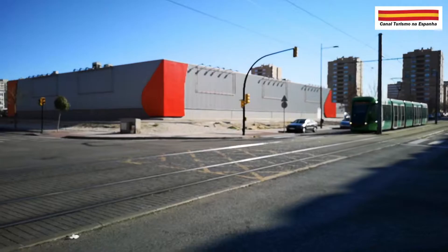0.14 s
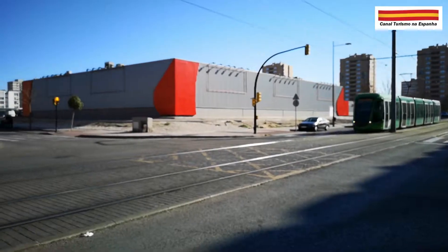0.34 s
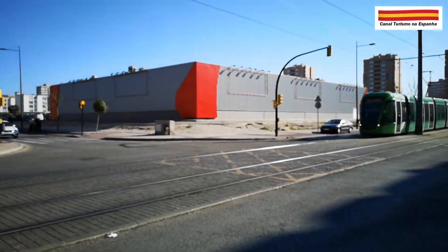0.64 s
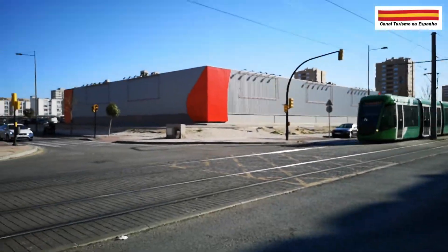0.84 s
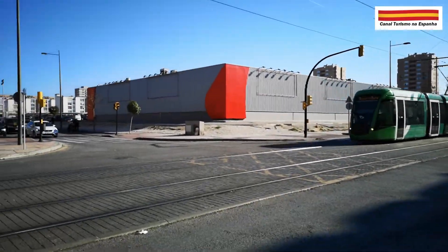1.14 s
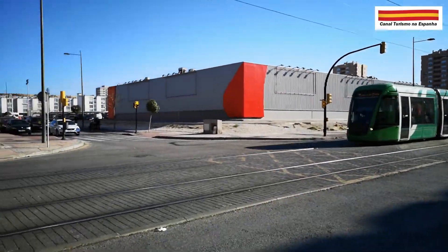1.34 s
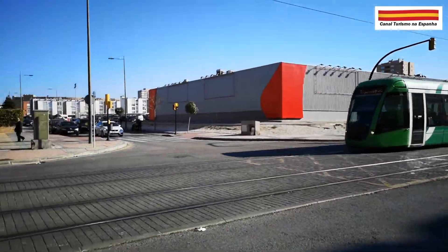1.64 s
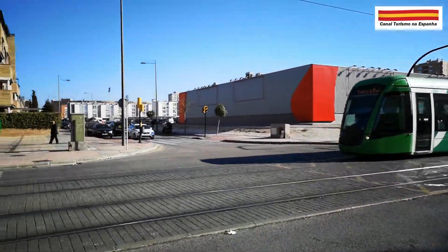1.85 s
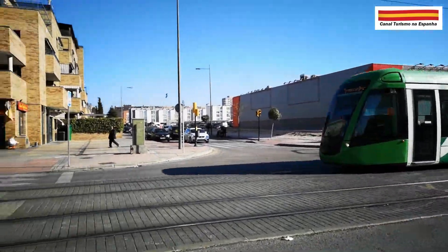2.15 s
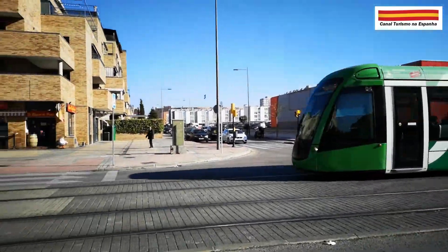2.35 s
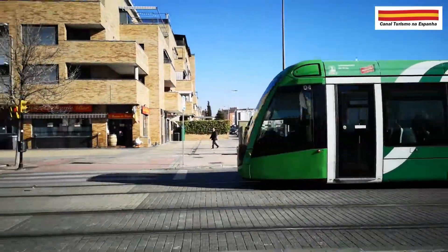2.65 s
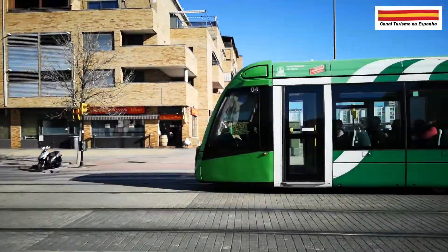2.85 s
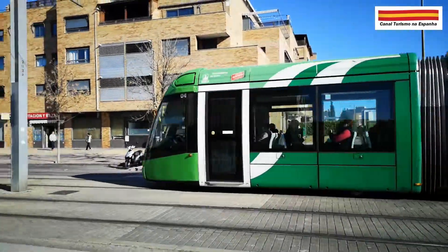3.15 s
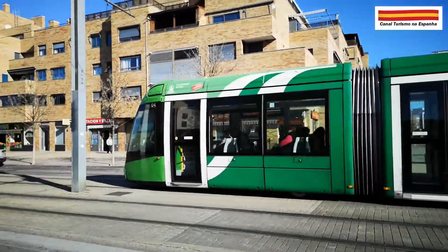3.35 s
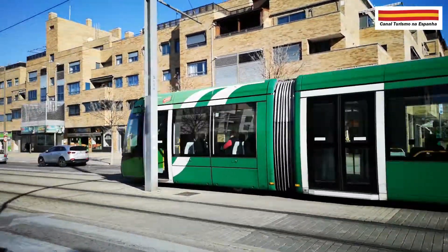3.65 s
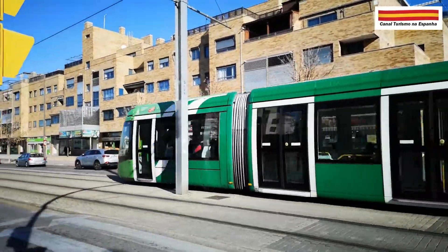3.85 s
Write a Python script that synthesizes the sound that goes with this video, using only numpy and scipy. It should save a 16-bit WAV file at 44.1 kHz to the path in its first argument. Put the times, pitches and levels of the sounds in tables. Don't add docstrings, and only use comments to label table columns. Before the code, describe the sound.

A tram approaches along street tracks, low rumble and rail knocks building, then passes close with booming, hissing wheels and a whine, over traffic hum, on a breezy outdoor hand-held stereo microphone.

```python
import sys
import numpy as np
from scipy import signal
from scipy.fft import rfft, irfft, next_fast_len
from scipy.io import wavfile
from scipy.ndimage import uniform_filter1d, map_coordinates

SR = 44100
rng = np.random.default_rng(int(sys.argv[2]) if len(sys.argv) > 2 else 0)


def persist_wave(psi):
    counts = np.round(np.clip(psi, -1, 1) * 32767).astype(np.int16)
    wavfile.write(sys.argv[1], SR, np.atleast_2d(counts).T)


def ratio(d):
    e = np.asarray(d, float) / 20
    return 10 ** e


N = 176400
T = np.arange(N) / SR

# time in seconds, level in dB.
NEARNESS = [
    (0.0, -40),
    (0.03, -44),
    (3.41, -28),
    (3.95, -32.5),
]
# time in seconds, level in dB, upper modes over lower in dB.
RAIL_SHAKE = [(0, -31, -0.5), (.8, -30, -2), (1.25, -31, 0.5), (1.37, -24.5, -3.5), (1.5, -26, -0.5),
              (2.1, -28, -1.5), (2.3, -29, 6.5), (2.56, -29.5, 10), (2.7, -33.5, 5), (2.8, -23.5, 6),
              (2.95, -14.5, 2.5), (3.1, -18.5, 2.5), (3.25, -28, 7), (3.55, -20.5, -3.5),
              (3.75, -21.5, 4.5), (4, -15.5, -3)]
# frequency in Hz, width in Hz, level in dB.
FLOOR_MODES = [(162, 11, -14), (208.1, 29.7, -1.5), (254, 62, -12), (290, 61.5, -7.5), (359.3, 20, -7),
               (393.8, 17.4, -11)]
# start in seconds, peak level in dB, ring in Hz.
RAIL_JOINTS = [(0.137, -26, 249), (0.354, -24.5, 183), (0.417, -24, 257), (0.467, -20.5, 226),
               (0.573, -22, 251), (0.652, -20.5, 239), (0.76, -21.5, 235), (0.824, -18, 248.4),
               (1.277, -24, 163), (1.362, -16.5, 202), (1.57, -27, 238), (1.915, -23, 263),
               (2.044, -29, 196), (2.119, -18.5, 224), (2.236, -19.5, 282), (2.272, -17, 225),
               (2.378, -19, 239), (2.508, -18, 279.7), (2.556, -13, 295.3), (2.669, -17, 239.4),
               (2.775, -13.5, 198), (2.806, -13.5, 173), (2.84, -11.5, 201), (2.92, -6, 197.6),
               (2.966, -9, 285), (3.044, -6.5, 195), (3.089, -9, 282), (3.205, -19, 200.5),
               (3.383, -15, 205.6), (3.471, -12, 246), (3.627, -17, 202), (3.701, -9.5, 214),
               (3.718, -10, 219), (3.759, -7.5, 195.6), (3.83, -7, 192), (3.878, -15, 289),
               (3.936, -16.5, 368.3), (3.953, -9, 195.7)]
# frequency in Hz, level in dB.
PANEL_RATTLE = [(200, -100), (400, -19.5), (480, 2), (800, 0), (1100, -15), (3000, -120)]
# frequency in Hz, level in dB.
ROLLING_HISS = [(250, -49), (450, 0.5), (900, -4), (1600, -7.5), (3000, -1.5), (4500, -24.5), (9500, -50),
                (16000, -57)]
# frequency in Hz, width in Hz, level in dB.
WHEEL_MODES = [(1255, 184, -1), (1876, 137, 0.5), (2470, 198, 4.5), (2950, 231, -0.5), (3300, 290, -11),
               (4105, 155, -13.5), (4570, 240, -17), (5630, 300, -21), (6990, 670, -27), (589, 97, -4.5),
               (990, 100, -27)]
# frequency in Hz, likeness from 0 to 1.
RING_LIKENESS = [(600, .4), (1200, .75), (3300, .7), (5000, .35)]
# frequency in Hz, width in Hz, level in dB.
SCRAPE_MODES = [(2488, 200, 3.5), (2780, 180, -6)]
# middle in seconds, half length in seconds, level in dB.
BOGIE_PASSES = [
    (2.5, .16, -7),
    (3.37, .08, -3.5),
    (3.53, .07, -3),
    (3.82, .15, -7),
]
# middle in seconds, half length in seconds, frequency in Hz, width in Hz, level in dB.
APPROACH_SONG = [
    (1.19, 0.24, 1200, 150, -46.5),
    (1.12, 0.35, 3020, 400, -45.5),
    (0.77, 1, 2700, 77, -52),
    (.8, 0.82, 2885, 70, -53.5),
]
# time in seconds, level in dB.
WHINE_LEVEL = [(.95, -62), (1.15, -52), (1.22, -48), (1.32, -55), (1.4, -46), (1.55, -45.5), (1.575, -58),
               (2.2, -50), (2.76, -51), (2.82, -40), (2.87, -48), (2.95, -35), (3.02, -44), (3.07, -54),
               (3.32, -52), (3.35, -33), (3.41, -36), (3.47, -44), (3.495, -33), (3.55, -37), (3.6, -44),
               (3.64, -34), (3.67, -48), (3.75, -58)]
# time in seconds, level in dB.
QUARTER_LEVEL = [(0, -49), (.3, -56), (1.2, -50), (1.45, -48), (1.62, -58), (1.76, -46), (2.03, -46),
                 (2.12, -54), (2.6, -49), (3, -56)]
# time in seconds, level in dB.
GEAR_LEVEL = [(.5, -62), (.66, -52), (.8, -52), (.87, -48), (1, -41), (1.1, -38), (1.135, -43), (1.17, -37),
              (1.255, -36.5), (1.28, -52), (1.5, -49), (1.6, -58)]
# middle in seconds, half length in seconds, pitch in Hz, slide in Hz per second, level in dB.
WHEEL_NOTES = [(2.81, .06, 5630, 1200, -56), (2.66, .1, 5520, 300, -63), (2.41, .06, 5990, 0, -66),
               (2.94, .04, 5500, 0, -61), (3.45, .3, 1825, -70, -50), (3.45, .3, 965, -30, -52),
               (2.85, .05, 2260, -900, -44), (1.08, .12, 2900, 0, -51), (3.85, .03, 840, 0, -42),
               (3.37, .06, 2470, 0, -41), (3.8, .08, 2430, -200, -43)]
# frequency in Hz, level in dB.
TRAFFIC_HUM = [(15, -7.5), (30, -7.5), (55, -8.5), (70, -10), (150, -11.5), (500, -39.5), (6000, -48.5),
               (12000, -100)]
# pitch in Hz, middle in seconds, half length in seconds, level in dB.
FAR_BRAKE = [(4861, .2, .13, -68), (5136, .38, .25, -73), (5981, .1, .2, -72), (7230, .43, .12, -75),
             (8533, .3, .5, -81)]
# middle in seconds, swing in Hz, level in dB.
WIND_GUSTS = [(.01, 36.8, -23.5), (0.303, 44, -30), (.8, 45.8, -26.5), (0.968, 43.7, -25),
              (1.502, 51.3, -28.5), (2.101, 33.5, -32), (2.489, 36.3, -23), (2.688, 39.2, -23.5),
              (2.735, 62.3, -22), (2.899, 59.7, -27.5), (3.182, 30.3, -32), (3.793, 44.7, -25.5),
              (3.907, 35.6, -22), (3.87, 107, -28), (3.959, 93, -32.5)]
# frequency in Hz, likeness from 0 to 1.
PORT_LIKENESS = [(30, 0.98), (100, 1), (200, 0.98), (300, 0.96), (420, 0.33), (610, 0.45), (1330, 0.11),
                 (2900, 0.19), (6000, 0.12)]
# frequency in Hz, level with tram ahead in dB, with tram beside in dB.
LEFT_COLOUR = [(390, -0.5, 2.5), (620, 0, 0.5), (1310, 1, 2.5), (1450, 3, 0.5), (2700, -3.5, 2),
               (2900, -11.5, -7), (3130, -3, -2), (8220, 14.5, 15.5)]
RIGHT_COLOUR = [(423, -0.5, 2.5), (620, 2, 4), (1290, -0.5, 1.5), (1710, -0.5, -3.5), (2220, 3, 6.5),
                (3180, 2.5, -0.5), (3500, 3, 2.5), (8200, 1.5, -0.5)]
# frequency in Hz, phase in radians.
LEFT_LEAD = [(520, -1.5), (780, -.2), (1250, -.9), (1980, -.9), (2300, -3.1), (2840, -2.6), (3250, -.8),
             (7060, 6.5)]
TURN_TIMES = (1, 3.2)
# frequency in Hz, level in dB.
SELF_HISS = [(6000, -82), (11200, -3), (15200, -7.5), (16000, -86.5)]

JOINT_DB, JOINT_S = -4, 0.0084
UPPER_RING, UPPER_DB, CLACK_DB = 1.55, -12, -24
KNOCK_TOP_HZ, RATTLE_DB = 1100, -16.5
WHEEL_DB, ROLL_DB = -2, -4.5
WHINE_HZ, SPEED_MS, PASS_S, DISTANCE_M = 1972, 13, 3.15, 6.5
GEAR_HZ, GEAR_RISE_HZ, GEAR_SETTLE_S = 1944, 38, .25
TRAFFIC_DB, TRAFFIC_GROWS = -36.5, 0.085
GUST_S = 0.035
TICK_S, TICK_DB, TICK_HZ, TICK_T60, SNAP_DB = .316, -18, 420, .011, -21
LEFT_TOP_HZ, SELF_DB = 9070, -83.5
LIMIT = .75


def unit(x):
    return x / np.sqrt(np.mean(x ** 2) + 1e-20)


def along(points, hz):
    f, value = np.transpose(points)
    return np.interp(np.log(hz + 1), np.log(f + 1), value)


def curves(rows):
    s, *columns = np.transpose(rows)
    return [np.interp(T, s, column) for column in columns]


def bump(s, half):
    return np.exp(-((T - s) / half) ** 2)


def wobble(rate):
    coarse = T[::64]
    knots = rng.standard_normal(int(N * rate / SR) + 4)
    return np.interp(T, coarse, map_coordinates(knots, [coarse * rate]))


def filtered(x, response):
    m = next_fast_len(N + SR // 2)
    return irfft(rfft(x, m) * response(np.fft.rfftfreq(m, 1 / SR)), m)[..., :N]


def modes(table):
    def response(f):
        total = 0
        for k, (centre, width, db) in enumerate(table):
            damping = 1j * f * width
            total = total + (-1) ** k * ratio(db) * damping / (centre * centre - f * f + damping)
        return total
    return response


def rush(response, patchy_db, alike=PORT_LIKENESS):
    z = signal.stft(rng.standard_normal((2, N)), nperseg=1024)[2]
    patches = uniform_filter1d(rng.standard_normal(z.shape[1:]), size=4, axis=0)
    patches = uniform_filter1d(patches, size=16, axis=1)
    pair = signal.istft(z * ratio(patchy_db * unit(patches)), nperseg=1024)[1][:, :N]

    def spread(hz):
        turn = np.arccos(np.clip(along(alike, hz), -1, 1)) / 2
        return response(hz) * [np.cos(turn), np.sin(turn)]
    mid, side = filtered(pair, spread)
    return unit(np.array([mid + side, mid - side]))


def tone(hz, drift_hz, flutter_db):
    phase = 2 * np.pi * np.cumsum(hz + drift_hz * wobble(60)) / SR
    gap, beads = .25 * wobble(3), wobble(35)
    sides = []
    for sign in (1, -1):
        flutter = ratio(flutter_db * (beads + .4 * wobble(12)))
        sides.append(flutter * np.sin(phase + sign * gap))
    return np.sqrt(2) * np.array(sides)


def boom():
    shake_db, upper_db = curves(RAIL_SHAKE)

    def edges(f):
        return (f / 150) ** 2 / (1 + (f / 150) ** 2) / (1 + (f / 430) ** 6)
    lower = rush(lambda f: modes(FLOOR_MODES[:3])(f) * edges(f), patchy_db=3.0)
    upper = rush(lambda f: modes(FLOOR_MODES[3:])(f) * edges(f), patchy_db=2.0)
    rattle = rush(lambda f: ratio(along(PANEL_RATTLE, f)), patchy_db=2.5)
    shaking = ratio(shake_db - 4) * (lower + ratio(upper_db - 4.5) * upper + ratio(RATTLE_DB) * rattle)
    knocks = sum(knock(*row) for row in RAIL_JOINTS)
    return shaking + filtered(knocks, lambda f: 1 / (1 + (f / KNOCK_TOP_HZ) ** 6))


def knock(s, db, hz):
    t = np.arange(SR // 8) / SR
    u, turn = t / JOINT_S, 2 * np.pi * hz * t
    ring = u * np.exp(1 - u) * (np.sin(turn) + ratio(UPPER_DB) * np.sin(UPPER_RING * turn))
    dull = unit(uniform_filter1d(rng.standard_normal((2, len(t))), size=40))
    clack = ratio(CLACK_DB) * 2 * u * np.exp(1 - 2 * u) * dull
    return np.pad(ratio(db + JOINT_DB) * (ring + clack), [(0, 0), (round(s * SR), N)])[:, :N]


def rolling():
    near_db, = curves(NEARNESS)
    hiss = ratio(ROLL_DB + 0.17 * wobble(6)) * rush(lambda f: ratio(along(ROLLING_HISS, f)), patchy_db=2.0)
    ring = rush(lambda f: modes(WHEEL_MODES)(f) / (1 + (f / 8500) ** 4), patchy_db=1.8,
                alike=RING_LIKENESS)
    ring = ratio(WHEEL_DB + .8 * wobble(16)) * ring
    scrape = ratio(2.5 * wobble(40)) * rush(lambda f: modes(SCRAPE_MODES)(f) ** 2, patchy_db=1.5)
    passes = sum(ratio(db) * bump(s, half) for s, half, db in BOGIE_PASSES)
    return approach() + ratio(near_db) * (hiss + ring + scrape * passes)


def approach():
    grain = rng.standard_normal(N) * ratio(1.8 * wobble(30))
    song = 0
    for s, half, hz, width, db in APPROACH_SONG:
        band = filtered(grain, lambda f: modes([(hz, width, 0)])(f) ** 2)
        song = song + ratio(db) * bump(s, half) * unit(band)
    return song


def drive():
    x = SPEED_MS * (T - PASS_S)
    whine_hz = WHINE_HZ * (1 - SPEED_MS / 343 * x / np.hypot(x, DISTANCE_M))
    gear_hz = GEAR_HZ - GEAR_RISE_HZ * np.exp((GEAR_LEVEL[0][0] - T) / GEAR_SETTLE_S)
    quarter = tone(whine_hz / 4, drift_hz=7, flutter_db=4)
    out = ratio(curves(QUARTER_LEVEL)[0]) * quarter * [[.6], [1.2]]
    for rows, hz in ((WHINE_LEVEL, whine_hz), (GEAR_LEVEL, gear_hz)):
        sounding = (T > rows[0][0]) * (T < rows[-1][0])
        out = out + sounding * ratio(curves(rows)[0]) * tone(hz, drift_hz=6, flutter_db=1.2)
    for s, half, hz, slide, db in WHEEL_NOTES:
        note = tone(hz + slide * (T - s), drift_hz=hz / 220, flutter_db=2.5)
        out = out + ratio(db) * bump(s, half) * note
    return out


def tick():
    t = np.clip(T - TICK_S, 0, None)
    swing = ratio(TICK_DB - 60 * t / TICK_T60) * np.cos(2 * np.pi * TICK_HZ * t)
    snap = np.cos(2 * np.pi * 6500 * t) + .7 * np.cos(2 * np.pi * 2200 * t)
    snap = ratio(SNAP_DB - 60 * t / 0.0011) * snap
    return (T >= TICK_S) * (swing + snap) * [[0], [1]]


def street():
    near_db, = curves(NEARNESS)
    hum_db = TRAFFIC_DB + TRAFFIC_GROWS * (near_db - near_db.mean()) + .8 * wobble(6)
    hum = ratio(hum_db) * rush(lambda f: ratio(along(TRAFFIC_HUM, f)), patchy_db=.5)
    gusts = 0
    for s, hz, db in WIND_GUSTS:
        swing = np.sin(2 * np.pi * hz * (T - s) + 1.1 * wobble(29))
        gusts = gusts + ratio(db) * bump(s, GUST_S) * swing
    brake = 0
    for hz, s, half, db in FAR_BRAKE:
        brake = brake + ratio(db) * bump(s, half) * tone(hz + 0 * T, drift_hz=18, flutter_db=3)
    return hum + gusts + brake


def ports(air):
    def lead(f):
        top = np.array([1 / (1 + (f / LEFT_TOP_HZ) ** 24), 1 + 0 * f])
        phase = along(LEFT_LEAD, f) * np.clip(f / 300 - 1, 0, 1)
        return top * np.exp(np.outer([.5j, -.5j], phase))

    def heard(column):
        colours = [np.take(p, [0, column], axis=1) for p in (LEFT_COLOUR, RIGHT_COLOUR)]
        return filtered(air, lambda f: lead(f) * ratio([along(c, f) for c in colours]))
    share = np.interp(T, TURN_TIMES, [0, 1])
    return (1 - share) * heard(1) + share * heard(2)


def electronics():
    return ratio(SELF_DB) * rush(lambda f: ratio(along(SELF_HISS, f)), patchy_db=-8.0)


def scene():
    air = boom() + rolling() + drive() + street()
    casing = filtered(tick(), lambda f: 1 / (1 + (f / 12000) ** 4))
    return ports(air) + casing + electronics()


def top_cut(x):
    return signal.sosfilt(signal.butter(12, 15150, fs=SR, output="sos"), x)


def record(dry):
    soft = dry / (1 + np.abs(dry / LIMIT) ** 4) ** .25
    return top_cut(soft)


dry = scene()
out = record(dry)
persist_wave(out)
```